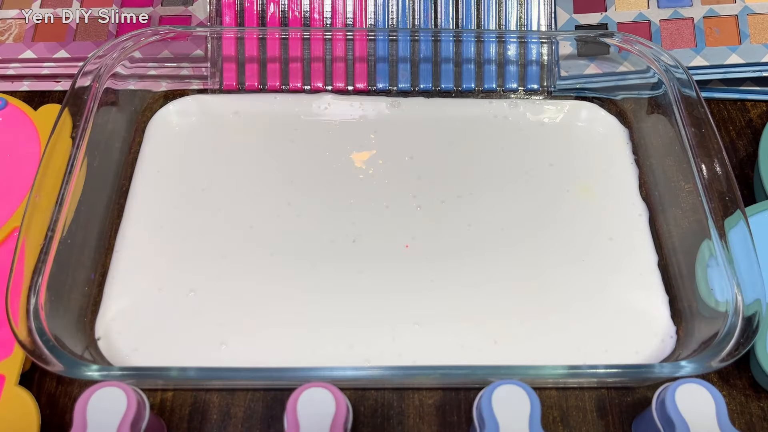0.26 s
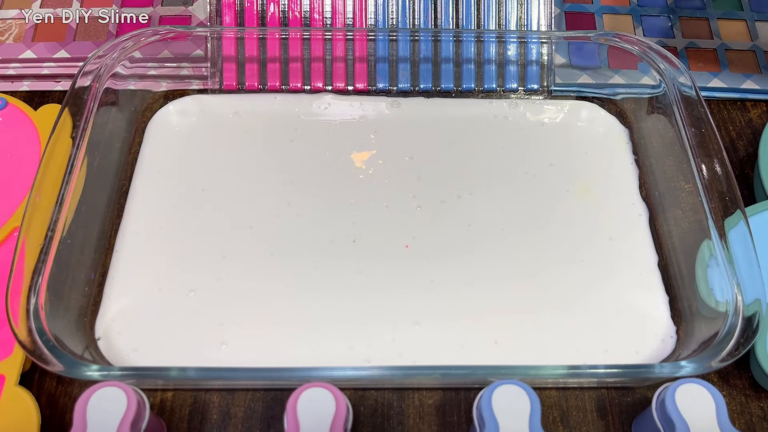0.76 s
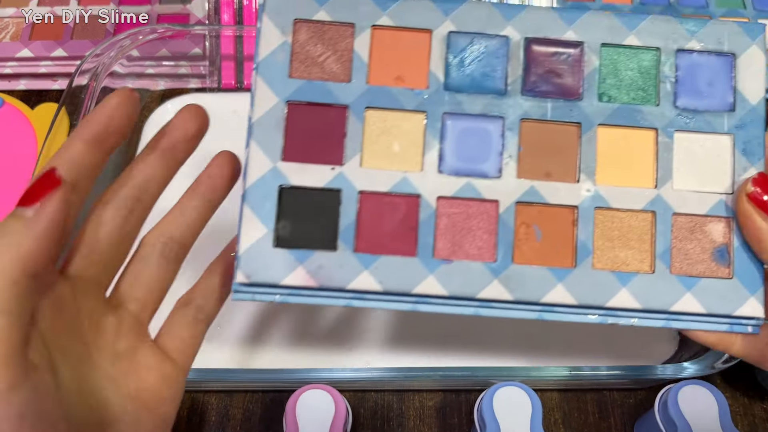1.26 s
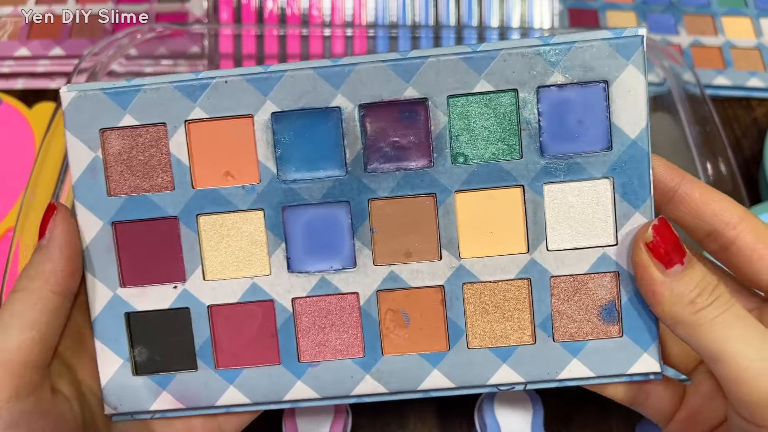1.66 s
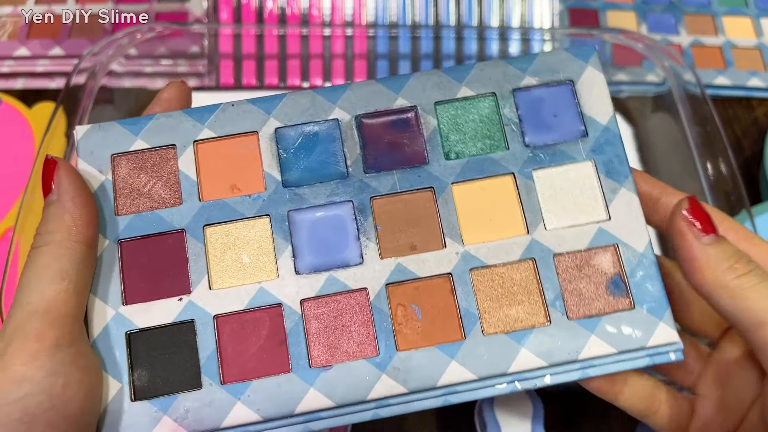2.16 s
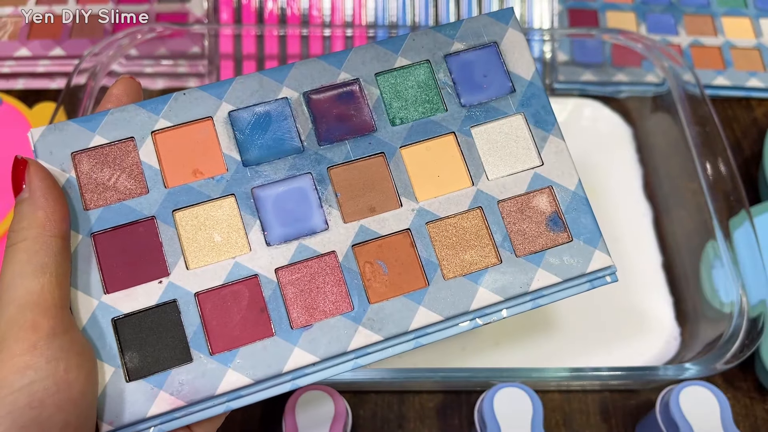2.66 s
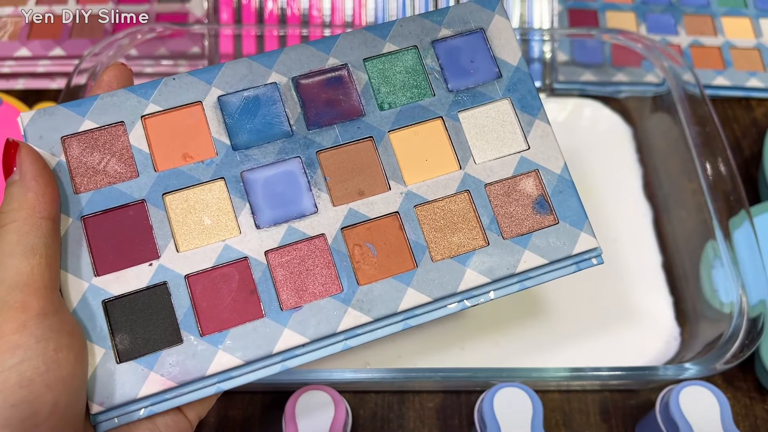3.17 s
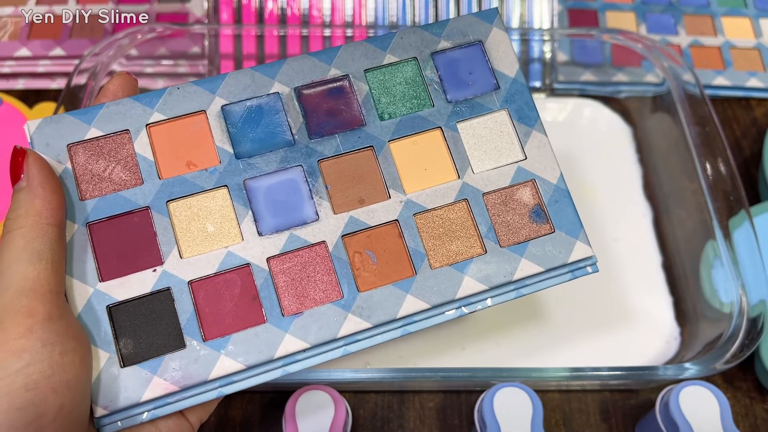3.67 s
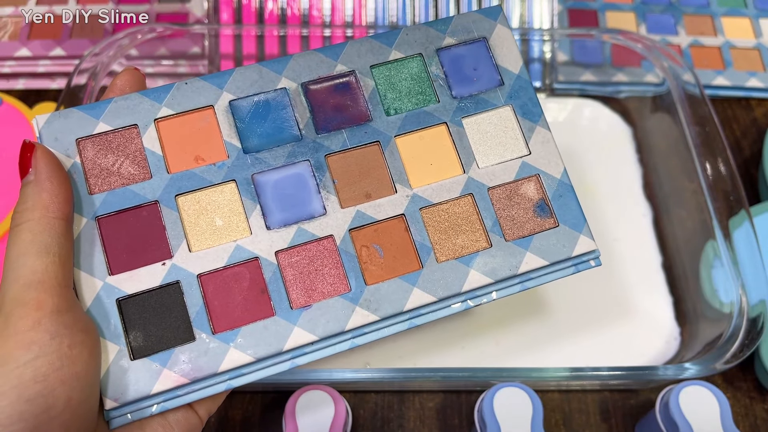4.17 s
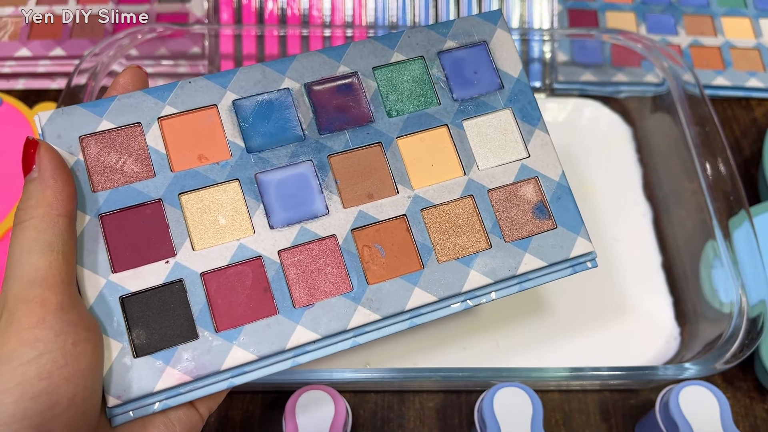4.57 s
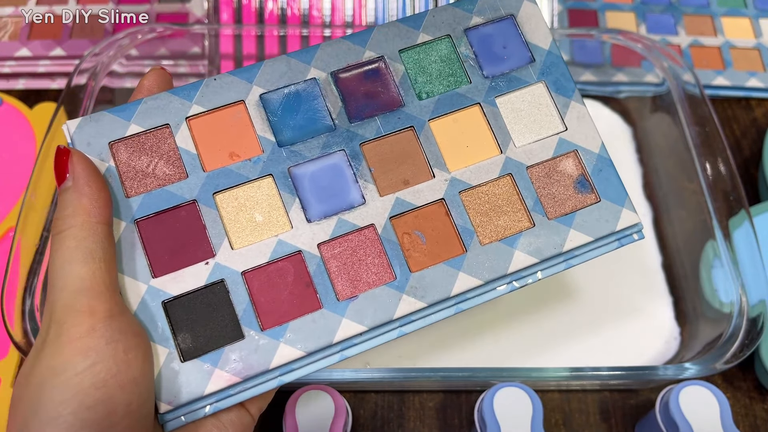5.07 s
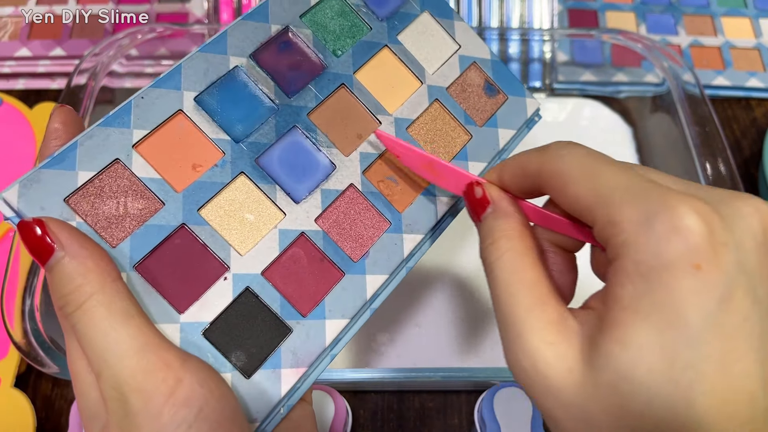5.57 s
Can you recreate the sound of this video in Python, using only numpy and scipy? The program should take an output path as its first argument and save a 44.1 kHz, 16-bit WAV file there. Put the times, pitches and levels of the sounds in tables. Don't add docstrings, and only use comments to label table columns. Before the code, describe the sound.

A close stereo microphone in a small room picks up a cardboard palette handled by fingers and nails. Quiet hum, airy background and faint hiss run throughout, with muffled far bumps in the first half second. Light ticks near 0.3 s lead into the loudest event, a hard hollow knock at 0.37 s with a low thump, then a weaker knock and scuff at 0.6 s. It is mostly quiet until soft finger strokes around 1.5 and a clearer brush at 2.0 s. At 2.74 s a sharp nail click runs into a strong double clack and drag at 2.8 s. Another knock at 3.2 s brings scraping, small snaps and a duller knock at 3.36 s. Taps and bright clicks follow at 3.8-3.9 and 4.07-4.3 s. A nail squeak, snaps and rattling knocks cluster at 4.46-4.52 s. Only faint brushes near 5.2 s remain before quiet room tone.

```python
import sys
import numpy as np
from scipy import signal
from scipy.fft import rfft, irfft, next_fast_len
from scipy.io import wavfile
from scipy.ndimage import uniform_filter1d

SR = 44100
rng = np.random.default_rng(int(sys.argv[2]) if len(sys.argv) > 2 else 0)


def how_loud(loudness_db):
    steps = np.asarray(loudness_db, float) / 20
    return 10 ** steps


def store_wav(level_fs):
    pcm = np.round(np.clip(np.atleast_2d(level_fs), -1, 1) * 32767)
    wavfile.write(sys.argv[1], SR, pcm.T.astype(np.int16))


N = 257103


def evened(x):
    return x / np.sqrt(np.mean(x ** 2) + 1e-20)


def read(points, hz):
    f, value = np.transpose(points)
    return np.interp(np.log(hz + 1), np.log(f + 1), value)


def add(mix, s, sound):
    part = mix[round(s * SR):][:len(sound)]
    part += sound[:len(part)]


def track(events):
    out = np.zeros(N)
    for s, sound in events:
        add(out, s, sound)
    return out


def colour(x, points):
    size = next_fast_len(x.shape[-1])
    gain = how_loud(read(points, np.fft.rfftfreq(size, 1 / SR)))
    return irfft(rfft(x, size) * gain, size)[..., :x.shape[-1]]


# f/Hz, likeness/1
LIKENESS = [(60, 0.46), (150, 0.38), (600, .3), (1100, 0.093), (12000, .1)]
# f/Hz, phase/rad
FAR_LEAD = [(60, -.3), (120, -.7), (250, -.6), (560, -1.07), (1000, -1.3)]


def noise(points, patchy_db, alike=None):
    frames, hz = N // 256 + 5, np.fft.rfftfreq(1024, 1 / SR)
    a, b, c, d, patches = rng.standard_normal((frames, 513, 5)).T
    patches = uniform_filter1d(patches, size=5, axis=0)
    patches = evened(uniform_filter1d(patches, size=8, axis=1))
    if alike is None:
        same = read(LIKENESS, hz)[:, None]
    else:
        same = np.interp(np.arange(frames) * 256, np.arange(N), alike)
    same = np.clip(same, -1, 1)
    left, other = a + 1j * b, c + 1j * d
    lag = np.exp(-1j * read(FAR_LEAD, hz))[:, None]
    z = np.array([left, same * left * lag + np.sqrt(1 - same ** 2) * other])
    z = z * how_loud(read(points, hz)[:, None] + patchy_db * patches)
    return evened(signal.istft(z, nperseg=1024, noverlap=768)[1][:, :N])


# f/Hz, level/dB
FLOOR_COLOUR = [(12, -23.5), (25, 19), (90, 23), (200, 17.5), (1000, 10), (2500, 2.5), (7800, -5.5),
                (8500, 7), (9300, -8), (11000, 1.5), (12500, -19.5), (14000, -48.5)]
# f/Hz, level/dB
PORT_COLOUR = [(5100, -26.5), (5400, -13.5), (6150, -1.5), (6900, -13.5), (7600, -29)]
PORT_LEVEL_DB = [
    [-67],
    [-103],
]


def room_tone():
    return how_loud(-73.5) * noise(FLOOR_COLOUR, patchy_db=2.5) + how_loud(PORT_LEVEL_DB) * noise(PORT_COLOUR, patchy_db=2.0)


# t/s, level/dB
HUM_LEVEL = [(0.0, -68.5), (1.27, -82.5), (2.71, -68.5), (2.87, -70.5), (3.13, -63.5), (3.3, -70.5),
             (4.06, -80), (4.48, -79.5), (4.59, -83), (5.15, -80.5), (5.45, -72), (5.83, -84.5)]


def hum():
    level = how_loud(np.interp(np.arange(N) / SR, *np.transpose(HUM_LEVEL)))
    waver = evened(uniform_filter1d(rng.standard_normal((2, N)), size=2000))
    hz = 117.5 + 6.5 * waver[1]
    return level * np.sqrt(2) * how_loud(2.08 * waver[0]) * np.sin(2 * np.pi * np.cumsum(hz) / SR)


# t/s, level/dB
AIR_LEVEL = [(0.0, -62), (0.42, -57), (0.5, -60), (0.66, -64.5), (0.89, -68), (2.24, -66.5), (2.4, -63.5),
             (2.57, -57.5), (2.65, -57), (2.99, -58.5), (3.46, -54.5), (3.6, -58), (3.8, -66.5),
             (4.35, -65), (4.48, -69.5), (4.76, -68), (5.16, -67), (5.83, -66)]
# f/Hz, level/dB
AIR_SPECTRUM = [(300, -21.5), (440, -9), (520, 5), (680, -6.5), (900, -21.5), (1300, -50)]
# f/Hz, level/dB
RUMBLE_COLOUR = [(100, -22.5), (180, -11.5), (240, -0.5), (400, -3), (520, -29), (800, -53)]
# f/Hz, level/dB
HANDLING_COLOUR = [(15, -3.5), (30, 0.5), (55, 4.5), (90, -32)]


def air():
    air_db = np.interp(np.arange(N) / SR, *np.transpose(AIR_LEVEL))
    rumble_db = -76.5 + 1.3 * (air_db + 66.5)
    handling_db = -82.5 + 1.3 * (air_db + 61.5)
    alike = np.clip(.55 + 0.1 * (air_db + 67), 0, .97)
    hiss = how_loud(air_db) * noise(AIR_SPECTRUM, patchy_db=1.1, alike=alike)
    rumble = how_loud(rumble_db) * noise(RUMBLE_COLOUR, patchy_db=-1.0, alike=alike)
    handling = how_loud(handling_db) * evened(colour(rng.standard_normal(N), HANDLING_COLOUR))
    return hiss + rumble + handling


# t/s, peak level/dB
FAR_BUMPS = [
    (0.069, -45),
    (0.251, -41),
    (0.507, -45.5),
    (2.359, -46),
    (2.484, -41),
    (2.601, -73),
    (2.686, -47.5),
    (3.021, -44),
    (3.179, -46),
]


def bumps():
    t = np.arange(6000) / SR
    flare = track((s, how_loud(db - 7.5 - 60 * t / 0.33) * np.minimum(t / 0.00092, 1)) for s, db in FAR_BUMPS)
    return flare * noise(AIR_SPECTRUM, patchy_db=1.5, alike=np.ones(N))


# f/Hz, t60/s
ROOM_DECAY = [(150, 0.18), (1000, 0.11), (4000, 0.18), (12000, 0.17)]


def room(x):
    taps = np.zeros((2, SR // 2))
    slots = np.arange(180, SR // 2 - 20, 20)
    at = slots + rng.integers(0, 20, (2, len(slots)))
    np.put_along_axis(taps, at, rng.choice([-1., 1.], at.shape), 1)
    hz, t, z = signal.stft(taps, SR, nperseg=256)
    tail = signal.istft(z * how_loud(-60 * t / read(ROOM_DECAY, hz)[:, None]), SR, nperseg=256)[1]
    return signal.fftconvolve(x[None], tail / np.linalg.norm(tail[0]), axes=1)[:, :N]


def scatter(x):
    decay_s = 0.0022
    taps = rng.standard_normal((2, 800)) * np.exp(-np.arange(800) / (decay_s * SR))
    return how_loud(-2.5) * signal.oaconvolve(x[None], taps / np.linalg.norm(taps[0]), axes=1)[:, :N]


# f/Hz, level/dB
NEAR_LEAN = [(150, 1.5), (500, 0.5), (1200, -7.5), (2500, 8), (3800, 0.5), (5000, 8.5), (6500, 1),
             (10000, -0.4)]
# f/Hz, lag/cycles
NEAR_LAG = [(400, .06), (1900, .1), (2350, .2), (3000, .76), (3750, .9), (4500, .97), (6100, 1.88),
            (7500, 1.9), (8900, 2.1), (10500, 2.55), (12500, 2.98)]


def ports(near):
    size = next_fast_len(N)
    hz = np.fft.rfftfreq(size, 1 / SR)
    lean = how_loud(read(NEAR_LEAN, hz) / 2)
    left = lean * np.exp(-2j * np.pi * read(NEAR_LAG, hz))
    return irfft(rfft(near, size) * [left, 1 / lean], size)[:, :N]


def ring(drive, modes, rise_s=0.):
    t = np.arange(4096) / SR
    body = np.zeros(4096)
    for k, (hz, db, t60) in enumerate(modes):
        body += (-1) ** k * how_loud(db - 60 * t / max(t60, .002)) * np.sin(2 * np.pi * hz * t)
    return signal.oaconvolve(drive, body * (1 - np.exp(-(t / (rise_s + 1e-6)) ** 2)))


def resonate(x, hz, width):
    turn, r = np.exp(2j * np.pi * np.cumsum(hz) / SR), np.exp(-np.pi * width / SR)
    return 2 * (turn * signal.lfilter([1 - r], [1, -r], x / turn)).real


# f/Hz, level/dB, t60/s
LID_MODES = [(900, 18.5, 0.04), (1150, -30.5, 0.046), (1457, -3, 0.013), (1760, 19, 0.036),
             (2096, -4, 0.018)]
# f/Hz, level/dB, t60/s
PAN_MODES = [(2320, 0.5, 0.0097), (2820, 5, 0.013), (3400, 5, 0.0081), (3800, -1, 0.026),
             (4507, 1.5, 0.0063), (4610, 0, 0.018), (5710, -1.5, 0.012), (6670, -2.5, 0.012)]
# f/Hz, level/dB
SKIN_COLOUR = [(2650, -35), (4500, -11), (4920, -3.5), (5200, -9.5), (6470, 3), (6960, -8.5), (8760, -3.5),
               (10300, 0), (11100, -0.5), (12500, -20), (16200, -41), (22000, -120)]
# f/Hz, level/dB
SHEEN_COLOUR = [(3000, -40), (5000, -18), (8000, -11.5), (10800, 6.5), (12000, -4.5), (13500, -24)]


def slide(s, swell_s, fade_s, levels, rasp_hz, rasp, grit_db, round_top):
    t = np.arange(-min(swell_s, s), fade_s, 1 / SR)
    span_db = 35
    pressure_db = -span_db * np.where(t < 0, -t / swell_s, t / fade_s) ** round_top
    draw, size = rng.random(SR // 2), rng.exponential(1, SR // 2)
    sign, fizz = rng.standard_normal((2, SR // 2))
    grains = sign * how_loud(grit_db * np.minimum(size, 5)) * (draw < 6000. / SR)
    slips = (grains + 0.6 * fizz)[:len(t)]

    def shaken(modes):
        return ring(slips, modes)[:len(t)]

    lid, pans = (shaken([(f, d, 0.095 * w) for f, d, w in modes]) for modes in (LID_MODES, PAN_MODES))
    glide_hz = rasp_hz * (1 + .03 * pressure_db / span_db)
    squeal = evened(resonate(slips, glide_hz, width=320.0 / max(rasp, 1) ** 0.51))
    pans = evened(pans) + 0.85 * evened(shaken([(2310, 0, 0.021)])) + rasp * squeal
    light = np.clip((levels[2] - levels[1]) / 26.0, 0, 1)
    skin = (1 - light) * evened(colour(slips, SKIN_COLOUR)) + light * evened(colour(slips, SHEEN_COLOUR))
    mixed = sum(how_loud(db) * evened(p) for p, db in zip((lid, pans, skin), levels))
    return s + t[0], signal.windows.tukey(len(t), .15) * how_loud(pressure_db) * mixed


# peak t/s, swell/s, fade/s, hiss level/dB, pan rasp re hiss/dB
LIGHT_STROKES = [(.1, 0.048, 0.06, -72, -10), (.314, 0.042, 0.0309, -56.5, -9.5),
                 (.71, .06, .03, -79, -26.5), (1.461, 0.037, 0.075, -73.5, -1),
                 (1.679, 0.21, 0.13, -78, -5.5), (2.012, .1, 0.06, -49.5, -21.5),
                 (2.14, 0.028, 0.05, -71, -8.5), (3.04, 0.048, 0.11, -59.5, -3.5),
                 (3.454, 0.088, 0.086, -49.5, 0), (3.545, 0.029, 0.022, -67, 1.5),
                 (3.6, 0.013, 0.042, -77, 7), (3.865, 0.035, 0.053, -65.5, -4.5),
                 (4.02, 0.064, 0.096, -64, -4.5), (4.12, .17, 0.14, -62.5, -2),
                 (5.124, .06, 0.042, -80.5, -19.5), (5.2, .06, 0.071, -75.5, -10),
                 (5.288, .05, .07, -77.5, -20.5)]


def strokes():
    return track(slide(s, swell_s, fade_s, (db - 21 + 0.52 * rasp_db, db + rasp_db, db),
                       rasp_hz=3520, rasp=0.66, grit_db=3.5, round_top=1.57)
                 for s, swell_s, fade_s, db, rasp_db in LIGHT_STROKES)


# peak t/s, swell/s, fade/s, rasp level/dB, skin hiss re rasp/dB
FIRM_RUBS = [(1.522, 0.021, 0.039, -60.5, -8), (2.742, 0.024, 0.046, -50.5, 0.5),
             (3.052, .06, 0.17, -55.5, -12.5), (3.199, 0.027, 0.0068, -55, -6),
             (3.29, 0.027, 0.34, -59, -28), (3.37, .2, 0.044, -52, -5.5), (3.408, .04, 0.12, -56.5, -2),
             (3.908, .06, 0.0525, -63, -12), (4.18, .004, .03, -63, -9), (4.207, .04, 0.073, -60, 0.5),
             (4.497, .035, 0.092, -46, 4), (4.513, .03, 0.089, -49.5, -15)]


def rubs():
    return track(slide(s, swell_s, fade_s, (db - 1.5, db, db + hiss_db),
                       rasp_hz=3800, rasp=0.94, grit_db=2.5, round_top=0.88)
                 for s, swell_s, fade_s, db, hiss_db in FIRM_RUBS)


# peak t/s, swell/s, fade/s, drag level/dB, pan rasp re drag/dB
BOARD_DRAGS = [(.381, .01, 0.087, -49, -5), (.36, .025, .008, -46.5, -10), (.578, .018, 0.11, -62, -30),
               (.622, .07, .05, -56.5, -2.5), (2.778, .008, .004, -37, -18.5),
               (2.803, .006, 0.0606, -41, -9.5), (2.84, .06, 0.14, -58.5, -25),
               (3.21, .004, 0.06, -45, -0.5), (3.374, .1, 0.057, -53.5, -10), (3.815, .004, 0.11, -61, -7),
               (4.305, .004, 0.065, -55, -9), (4.492, .05, 0.093, -45.5, 0)]


def drags():
    return track(slide(s, swell_s, fade_s, (db, db + rasp_db, db + rasp_db - 8.5),
                       rasp_hz=3700, rasp=.65, grit_db=3.0, round_top=1.13)
                 for s, swell_s, fade_s, db, rasp_db in BOARD_DRAGS)


# peak t/s, swell/s, fade/s, level/dB, f/Hz
NAIL_SQUEAKS = [
    (3.3, 0.037, 0.295, -58.5, 3920),
    (4.464, 0.041, 0.098, -49, 3320),
    (4.462, 0.027, 0.058, -55.5, 4720),
    (4.466, 0.032, 0.053, -50, 5140),
    (4.285, 0.086, 0.035, -64.5, 4750),
]


def squeaks():
    return track(slide(s, swell_s, fade_s, (db - 25.5, db, db - 15), hz, rasp=4.8, grit_db=4.0, round_top=1.1)
                 for s, swell_s, fade_s, db, hz in NAIL_SQUEAKS)


# t/s, peak level/dB, lowest f/Hz, length/s
NAIL_SNAPS = [(0.3194, -56, 1500, .001), (.367, -35, 2500, 0.00076), (.6224, -43, 3000, .0008),
              (2.7435, -39, 2800, .0015), (2.7962, -45, 2990, .001), (3.2011, -36, 1200, .0006),
              (3.28, -60, 3300, .002), (3.3105, -58, 3300, .002), (3.36, -50, 2500, 0.0017),
              (3.375, -51, 3500, .0015), (3.4114, -52, 3500, .003), (3.429, -48, 1500, .002),
              (3.453, -49, 1500, .002), (3.4655, -47, 2000, .002), (3.8092, -49, 1500, .0015),
              (3.8705, -33.5, 1500, 0.00058), (4.0715, -50, 4020, 0.0008), (4.086, -56, 6000, 0.0011),
              (4.138, -35, 3020, .0008), (4.176, -39, 1500, 0.0011), (4.2036, -52, 2480, .001),
              (4.2976, -41, 2500, .001), (4.485, -50, 1500, .002), (4.488, -42, 1500, .0015),
              (4.5, -41, 2500, .002), (4.504, -38, 1500, .002), (4.5135, -44, 2000, .002),
              (5.2, -67, 3000, .001)]


def snaps():
    out, t = np.zeros(N), np.arange(600) / SR
    for s, db, low_hz, length_s in NAIL_SNAPS:
        grit = rng.standard_normal(600) * np.minimum(t / .0002, 1) * np.exp(-t / length_s)
        burst = signal.lfilter(*signal.butter(2, [low_hz, 11000.], "band", fs=SR), grit)
        add(out, s, how_loud(db) * burst / abs(burst).max())
    return out


# t/s, peak level/dB, f/Hz, t60/s
LOOSE_RINGS = [(.3674, -5, 660, 0.0098), (.372, -36.5, 175, 0.16), (0.376, -43.5, 142, 0.13),
               (0.43, -44, 250, 0.048), (.39, -48.5, 87.6, 0.21), (0.42, -53, 340, 0.033),
               (.624, -57, 1480, 0.15), (.624, -62, 3350, 0.16), (.64, -62, 207, 0.032),
               (.625, -60.5, 59, 0.2), (2.72, -66.5, 3100, 0.056), (2.7805, -12, 1800, 0.0097),
               (2.784, -28, 1064, 0.0298), (3.202, -29.5, 850, 0.024), (3.809, -54.5, 930, 0.021),
               (3.1, -76, 1290, 0.022), (2.79, -54.5, 87, 0.078), (3.203, -30.5, 386, 0.074),
               (3.205, -42, 610, 0.14), (3.208, -37, 90, 0.086), (3.361, -39.5, 422, 0.064),
               (4.1753, -28.5, 3350, 0.017), (4.18, -65, 4000, 0.059), (4.51, -48, 3000, 0.13),
               (.368, -20, 560, .015), (4.46, -41, 3330, .025), (4.472, -43, 3400, .02),
               (2.7435, -36, 3250, .008), (2.79, -30, 1700, .015), (4.49, -35, 395, 0.047),
               (4.51, -38, 202, 0.088), (4.519, -50, 110, 0.15), (.42, -57, 43, 0.33),
               (2.79, -46.5, 45, .2), (5.194, -61.5, 248, 0.11)]


def rings():
    return track((s, ring([1.], [(hz, db, t60)], rise_s=2.0 / hz)) for s, db, hz, t60 in LOOSE_RINGS)


# f/Hz, level/dB, t60/s
BOARD_MODES = [(174, -3.5, 0.062), (251, -18, 0.13), (350, 21, 0.02), (602, 4, 0.023)]


def hit(s, db, hz, ring_t60, side_db, thud_db, others, other_db, tick_db, rise_s):
    t = np.arange(400) / SR
    grit = rng.standard_normal((3, 400))
    soft = how_loud(-.25 * (db + 14.0))
    rise_s = soft * rise_s
    force = np.exp(-t / .00006) + 0.24 * soft * grit[0] * np.exp(-t / (0.0014 * soft))
    tick = colour(np.pad(grit[1] * t * np.exp(-t / 0.00091), (0, 4095)), SKIN_COLOUR)
    own = [(hz, 0, ring_t60), (1.5 * hz, side_db, 0.636 * ring_t60), (.72 * hz, side_db, ring_t60)]
    gripped = [(f * (1 + .05 * g), d, 0.27 * w) for (f, d, w), g in zip(others, grit[2])]
    parts = ring(force, own, rise_s), ring(force, BOARD_MODES, 0.015), ring(force, gripped, rise_s), tick
    blow = sum(how_loud(db + rel) * p / abs(p).max() for p, rel in zip(parts, (0, thud_db, other_db, tick_db)))
    blow = blow * np.minimum(np.arange(len(blow))[::-1] / 1000, 1) ** 2
    lead_in = np.diff(rng.standard_normal(401)) * np.exp(-t[::-1] / .004)
    return s - 400 / SR, np.r_[how_loud(db + max(tick_db, -12) - 30) * lead_in, blow]


# t/s, peak level/dB, ring f/Hz, ring t60/s, edge tick re peak/dB
NAIL_CLICKS = [(0.076, -82, 5500, 0.015, -1), (0.3063, -60.5, 3150, 0.017, 0.5),
               (0.316, -59, 4770, 0.011, 8), (1.519, -55, 2820, 0.0038, -16), (2.134, -64, 5360, 0.013, -4),
               (2.7431, -31.5, 3320, 0.0022, 1.5), (3.2955, -45.5, 3790, 0.011, -25),
               (3.4287, -48, 3800, 0.02, 0), (3.6011, -58, 1900, 0.014, -3),
               (3.8698, -49, 3640, 0.003, 12.5), (4.071, -60.5, 5320, 0.012, 14),
               (4.076, -54, 3570, 0.011, -8), (4.1375, -47.5, 3800, 0.0042, 15),
               (4.1739, -40.5, 3370, 0.013, 9), (4.2028, -40.5, 3950, 0.004, -3.5),
               (4.4635, -43.5, 3400, 0.025, -25), (4.4748, -52, 3230, 0.016, -7.5)]


def clicks():
    return track(hit(s, db, hz, t60, -13.5, -33.0, LID_MODES, -63.5 + 0.81 * (db + 55) - db, tick_db, rise_s=0.00022)
                 for s, db, hz, t60, tick_db in NAIL_CLICKS)


# t/s, peak level/dB, ring f/Hz, pan ring re peak/dB, edge tick re peak/dB
FINGER_TAPS = [
    (0.314, -52, 1150, -4.5, -3),
    (0.575, -62, 1430, -25, -10.5),
    (3.811, -47, 900, -4, -17),
    (4.173, -48.5, 1340, -22, -28),
    (4.298, -49, 1650, -6, -8),
    (4.306, -52, 940, -14, -28),
]


def taps():
    return track(hit(s, db, hz, 0.026, -6.5, -22, PAN_MODES, pan_db, tick_db, rise_s=0.00087)
                 for s, db, hz, pan_db, tick_db in FINGER_TAPS)


# t/s, peak level/dB, ring f/Hz, pan ring re peak/dB, edge tick re peak/dB
BOARD_KNOCKS = [(0.3666, -13.5, 1090, -17, -28), (0.377, -55.5, 1330, -28, -35),
                (0.6091, -52, 1460, -3.5, -27), (0.622, -45, 1401, -13, -10.5),
                (2.7806, -28.5, 3680, -2.5, -4.5), (2.792, -26.5, 1150, -26, -27.5),
                (2.795, -27, 1009, -31, -11.5), (3.2035, -39, 755, -10, -14), (3.22, -59.5, 980, 6, -5),
                (3.359, -41, 800, -4.5, -19), (3.375, -41, 1083, -10, -6), (4.491, -35.5, 1030, 3.5, 2),
                (4.511, -43.5, 1048, 11, 2)]


def knocks():
    return track(hit(s, db, hz, 0.0043, -3.5, -47.5 + .3 * (db + 40) - db, PAN_MODES, pan_db, tick_db, rise_s=0.00051)
                 for s, db, hz, pan_db, tick_db in BOARD_KNOCKS)


def scene():
    background = room_tone() + air() + hum() + bumps()
    rubbing = strokes() + rubs() + drags() + squeaks()
    cracks, ringing = snaps(), rings()
    near = knocks() + taps() + clicks() + 0.75 * rubbing
    wet = colour(room(near + 1.2 * ringing), [(1500, -0.5), (3500, -1.0), (9000, -7.0)])
    far = how_loud(-5) * (wet + 0.28 * wet[::-1]) + background
    return how_loud(3.5) * ports(near + ringing + cracks) + far + scatter(rubbing + .3 * cracks)


def top_cut(x):
    return signal.sosfilt(signal.butter(12, 15700, fs=SR, output="sos"), x)


def record(dry):
    power_db = 10 * np.log10(signal.lfilter([.001], [1, -.999], (dry ** 2).mean(0)) + 1e-12)
    fall_db = np.arange(N) * 92.6 / SR
    over_db = np.maximum(np.maximum.accumulate(power_db + fall_db) - fall_db + 31.5, 0)
    mix = colour(dry / how_loud(0.11 * over_db), [(12200, 0), (13000, -17), (16000, -12)])
    return top_cut(mix)


dry = scene()
out = record(dry)
store_wav(out)
```